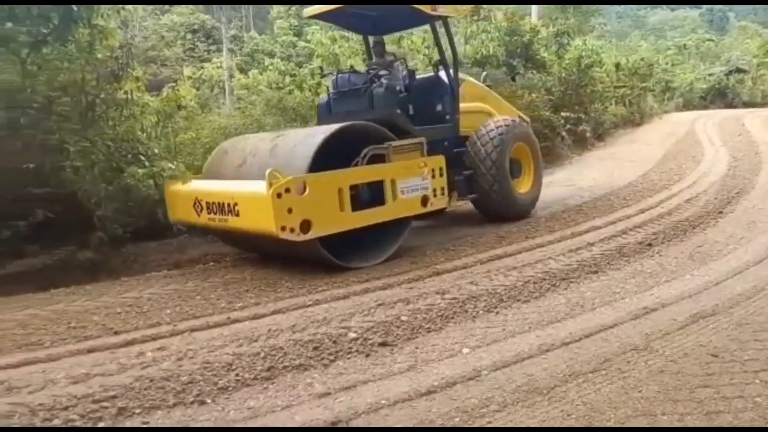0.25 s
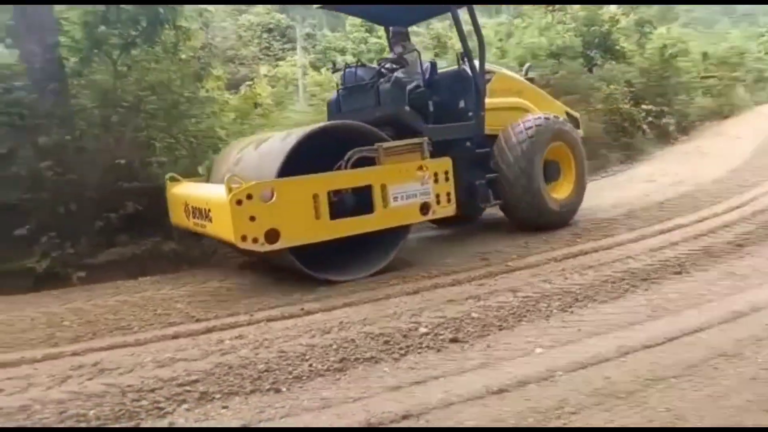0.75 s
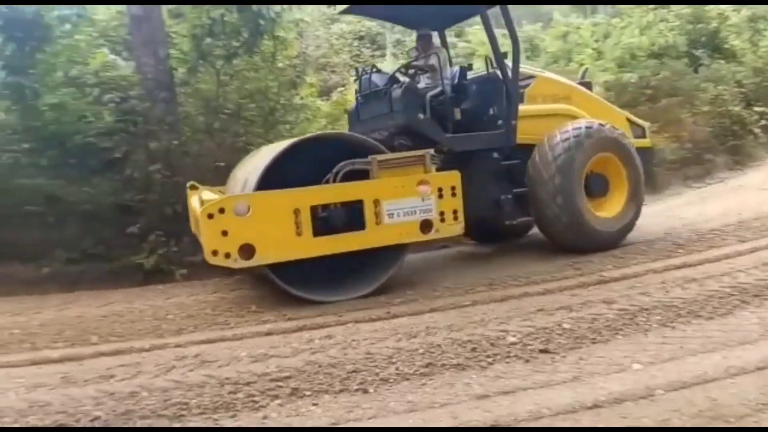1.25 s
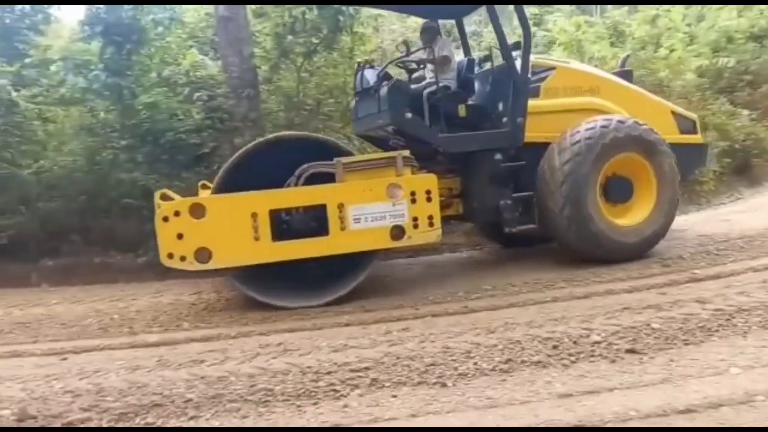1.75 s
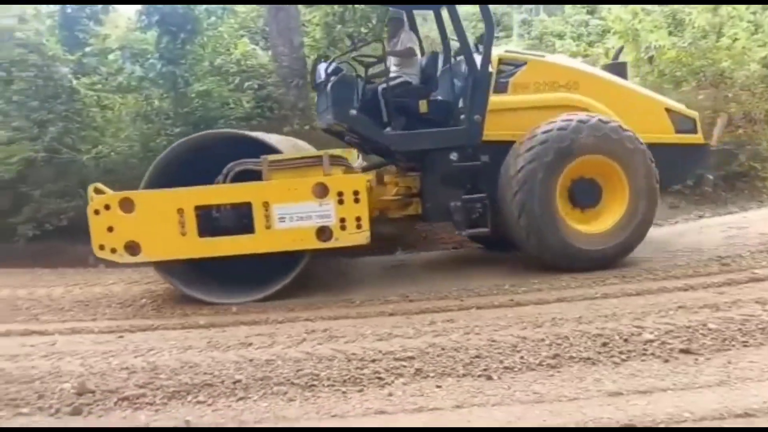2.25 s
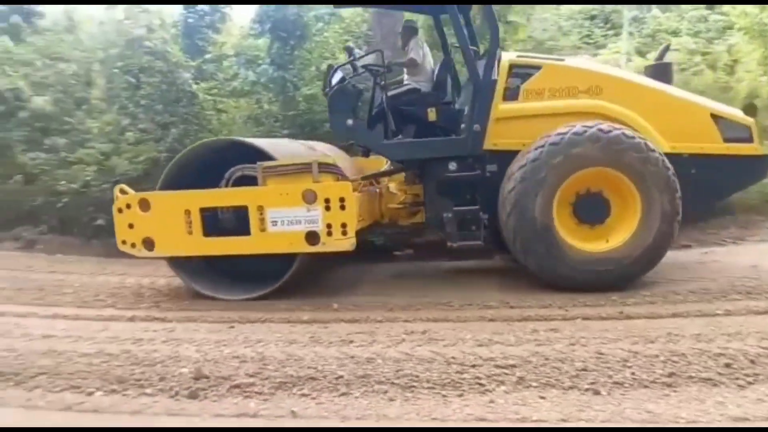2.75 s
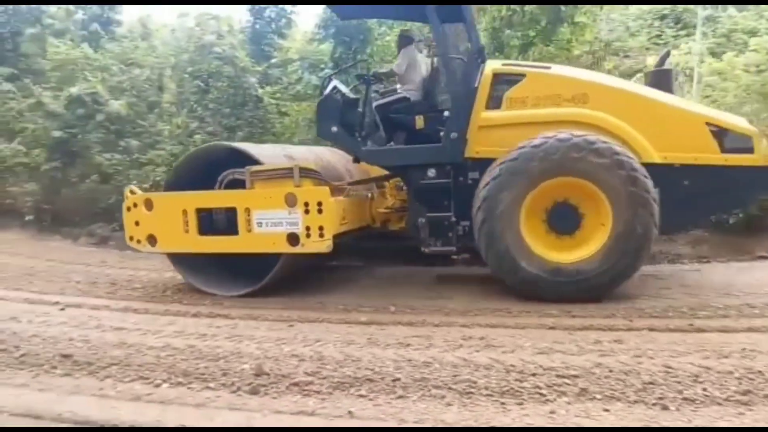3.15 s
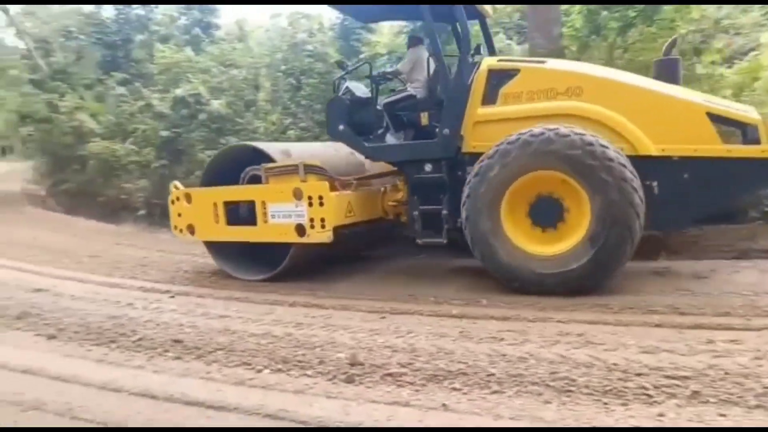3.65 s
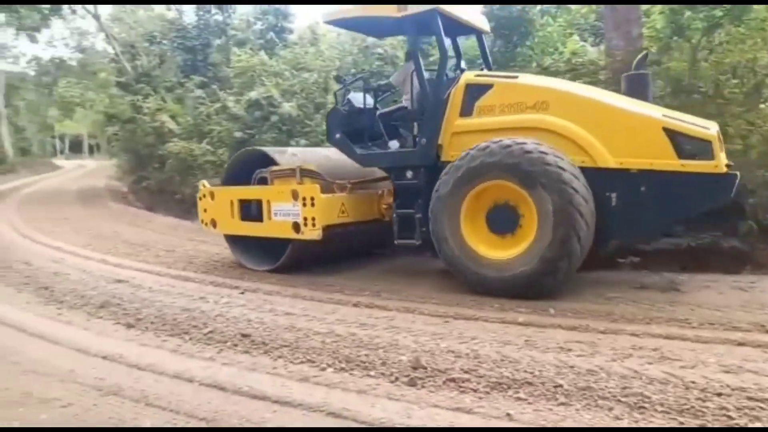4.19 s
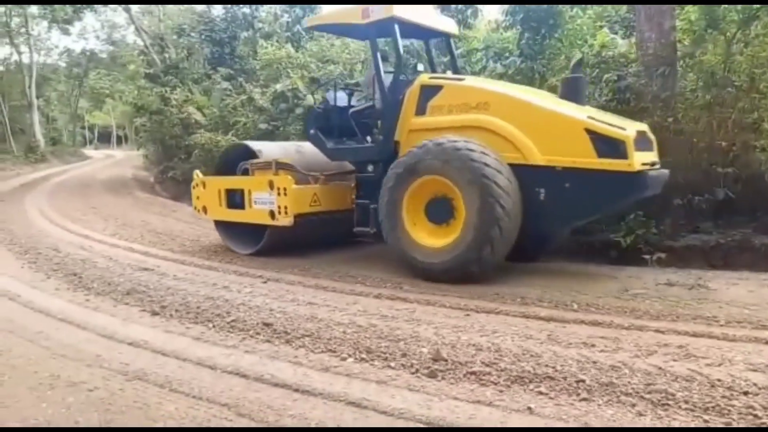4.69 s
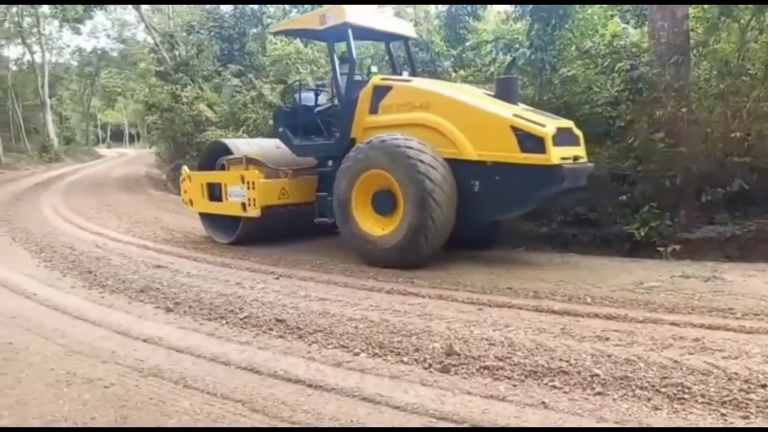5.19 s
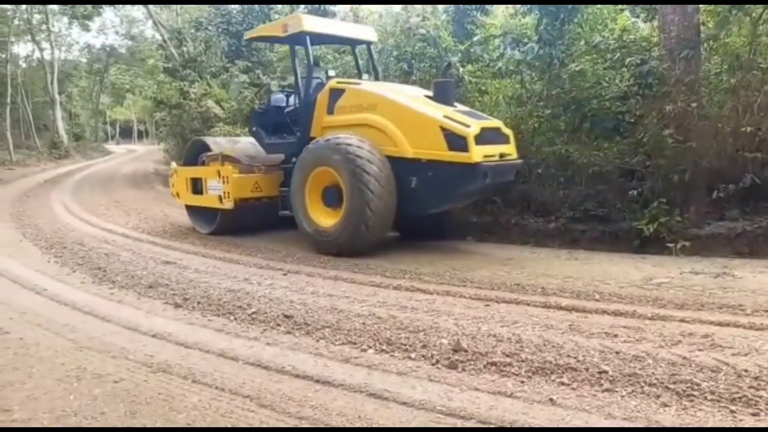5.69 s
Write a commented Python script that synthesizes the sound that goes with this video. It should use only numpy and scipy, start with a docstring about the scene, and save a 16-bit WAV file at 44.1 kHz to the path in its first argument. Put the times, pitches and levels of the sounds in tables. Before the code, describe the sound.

A vibrating road roller drives slowly past with a deep, steady diesel rumble, stones cracking under its ringing drum.

```python
"""On a gravel road, a vibrating road roller drives slowly past, close by.
Its four-cylinder diesel drones at the firing rate and throbs against a tone at three times the drum's
shaking rate. Stones crack under the steel drum and make it ring, and the engine block clatters.
Exhaust, fan and gravel roar, loose parts rattle with each shake, and a drive whines in passing.
A thin whistle rises near the end, and an insect chirps in the trees."""
import sys
import numpy as np
from scipy import signal
from scipy.io import wavfile
from scipy.ndimage import uniform_filter1d, map_coordinates

SR = 44100
rng = np.random.default_rng(int(sys.argv[2]) if len(sys.argv) > 2 else 0)


def master(y):
    """Save y as 16-bit WAV."""
    cut = np.clip(np.atleast_2d(y).T, -1, 1)
    pcm = np.round(cut * 32767)  # scale
    wavfile.write(sys.argv[1], SR, pcm.astype(np.int16))


N = 261513
TIME = np.arange(N) / SR

# How the noises change as the roller passes:
# (time [s], roar [dB], rumble [dB], drum ringing [dB], roar's tilt above 4 kHz [dB per octave])
PASS_BY = [(0, -32, -42, -24, 1), (.6, -32.5, -35.5, -25, -0.5), (1.5, -33, -38, -35, 1),
           (2.5, -34, -36.5, -27, 2), (3.1, -32, -32.5, -31, -0.5), (4.3, -33, -39, -31, 1.5),
           (5.3, -31.5, -33.5, -37.5, 2), (5.93, -31.5, -38, -29.5, 1.5)]


def engine(crank):
    """Four cylinders fire twice per crankshaft turn, making a drone; pumps add higher tones."""
    # Loud tones: (time [s], then a level [dB] for each of the five multiples below)
    loud = [(0, -25.5, -50, -36, -40, -47), (.9, -24, -49, -36, -40, -54),
            (1.5, -25.5, -46, -32.5, -42, -54), (2.4, -23, -45, -33.5, -44, -48),
            (3.1, -24.5, -40, -42, -48, -41), (4.2, -22.5, -37, -39, -47, -49),
            (5.0, -23.5, -43, -41, -52, -47), (5.93, -24, -42, -42, -52, -46)]
    # Weak engine and pump tones: (multiple of the crankshaft rate, level [dB])
    weak = [(2.5, -53), (3.5, -52), (4.5, -52), (6, -51), (7, -55), (15.94, -52), (17, -57), (17.96, -51),
            (21.5, -53), (23.3, -52)]
    # The drone dips briefly: (time [s], level change [dB])
    dips = [(3.08, -4.5), (3.29, -1), (4.36, -3.5), (5.26, -5), (5.78, -1.5)]
    dip_s = 0.058
    dip_db = sum(db * np.exp(-((TIME - s) / dip_s) ** 2) for s, db in dips)
    return shaft_tones(crank, (2, 4, 7.97, 8.98, 18.87), loud, weak) * gain_of(dip_db)


def drum_hum(shaker):
    """An off-centre weight spins inside the drum and shakes it."""
    # Loud tones: (time [s], then a level [dB] for each of the four multiples below)
    loud = [(0, -52, -58, -33, -56), (.9, -55, -47, -28, -57), (1.5, -55, -43, -25, -55),
            (2.5, -54, -35.5, -30.5, -50), (3.1, -51, -36, -32.5, -42), (4.3, -53, -36.5, -35, -47),
            (4.8, -55, -36.5, -45, -47), (5.93, -55, -37, -43, -47)]
    # Weak tones: (multiple of the shaking rate, level [dB])
    weak = [(4, -50), (9, -56), (11, -55), (12, -49), (13, -53), (16, -57)]
    return shaft_tones(shaker, (1, 2, 3, 5), loud, weak)


def drum_ringing(shaker):
    """Stones crack under the drum, most often when the weight presses down, and ring the steel."""
    # Ringing notes of the steel shell and frame: (pitch [Hz], width [Hz], relative level [dB])
    notes = [(243, 10, -35), (257.7, 6, 7), (291.3, 6.1, 6), (320, 27, -11), (336, 15, -4), (360, 3.3, -28),
             (391.6, 5, 4.5), (419.2, 10.5, 8), (423.7, 13, 2), (507, 14, -21), (580, 12, -9),
             (694, 16, -26), (740.5, 12, 9), (834, 47, -22), (900, 11, 5.5), (950, 12, -4),
             (1059, 6, -16.5), (1196, 22, -6), (1305, 19, -3.5), (1450, 10, -1), (1572, 10, -4),
             (2170, 23, -21), (2700, 76, -9), (4200, 150, -25), (5200, 160, -33), (6100, 120, -32)]
    # Larger stones crunching: (time [s], extra ringing [dB], pitch stirred most [Hz], length [s])
    crunches = [(.01, 3, 710, 0.17), (0.015, 6, 270, 0.077), (.3, 8.5, 290, 0.094),
                (0.316, 24, 1120, 0.073), (0.403, 10, 273, 0.16), (0.58, 2, 270, 0.034),
                (0.717, 20, 1340, 0.034), (1.07, 10, 2600, 0.088), (1.265, 20, 5000, .05),
                (1.277, 21, 352, 0.061), (1.278, 22, 1340, 0.095), (1.35, 18, 5700, .04),
                (1.435, 16, 5200, .03), (1.46, 15, 330, 0.049), (1.746, 16, 1400, 0.057),
                (1.956, 24, 1170, 0.13), (2.72, 13, 725, .05), (3.057, 16, 1010, 0.043),
                (3.906, 15, 330, 0.056), (4.323, 11, 1600, 0.12), (4.8, 8, 2150, .05),
                (5.645, 20, 850, 0.091), (5.675, 21, 490, 0.14), (5.7, 8, 2750, .1), (5.76, -3, 700, .1)]
    stones_per_s, crack_top_hz = 1500, 4770  # stones give way, so their cracks have little treble
    rise_s, spread_octaves = 0.0092, 0.35
    press = 1 + .4 * np.cos(2 * np.pi * shaker)
    size = gain_of(3 * np.minimum(rng.exponential(size=N), 4)) * rng.choice([-1, 1], size=N)
    stones = size * (rng.random(N) < press * stones_per_s / SR)
    stones = signal.sosfilt(signal.butter(N=2, Wn=crack_top_hz, fs=SR, output="sos"), stones)
    s, crunch_db, crunch_hz, length = np.transpose(crunches)
    since = np.maximum(TIME[::64] - s[:, None] + rise_s, 0)
    bursts = np.minimum(since / rise_s, 1) * np.exp(-(since / length[:, None]) ** 2)
    rings = []
    for hz, width, db in notes:
        nearness = np.exp(-(np.log2(hz / crunch_hz) / spread_octaves) ** 2)
        extra_db = np.interp(TIME, TIME[::64], (crunch_db * nearness) @ bursts)
        level = gain_of(db + 1.9 * drift(top_hz=4) + extra_db)
        rings.append(level * unit_level(resonate(stones, hz, width)))
    left_share = .5 + 0.22 * rng.uniform(-1.6, 1, size=len(notes))
    _, _, ring_db, _ = curves(PASS_BY)
    return gain_of(ring_db - 6.5) * spread(rings, left_share)


def roar(crank, shaker):
    """Exhaust, fan and crushed gravel make a broad noise that throbs lightly with firings and shakes."""
    # Tone colour of the roar: (frequency [Hz], relative level [dB])
    colour = [(110, -29), (180, -13), (209, -16), (309, -3), (520, -19.5), (728, -10.5), (810, -14),
              (1030, -17), (1500, -17.5), (1810, -24), (2100, -19.5), (3300, -27), (4670, -34.5),
              (6200, -30.5), (8510, -48.5), (14100, -37.5), (15400, -52)]
    roar_db, _, _, tilt_db = curves(PASS_BY)
    throb = 1 + 0.034 * np.cos(2 * np.pi * 2 * crank) + 0.02 * np.cos(2 * np.pi * shaker)
    level = gain_of(roar_db + 2 + 0.5 * drift(top_hz=12))
    return level * throb * noise(colour, size=1024, patchy_db=1.5, tilt_db=tilt_db)


def rumble():
    """The ground and the exhaust make a deep, uneven noise."""
    # Tone colour of the rumble: (frequency [Hz], relative level [dB])
    colour = [(11, -55), (18, -30), (42, -28), (52, -6), (75, -1), (101, 0), (129, -4), (230, -21),
              (300, -52), (510, -120)]
    _, rumble_db, _, _ = curves(PASS_BY)
    return gain_of(rumble_db - 0.5) * noise(colour, size=4096, patchy_db=6)


def clatter(crank):
    """Noisy knocks at the firing rate ring the engine block, each note swelling in its own time."""
    # Ringing notes of the block and covers: (pitch [Hz], width [Hz], relative level [dB])
    notes = [(1969, 133, -1.5), (2082, 40, -2.5), (2185, 91, 0), (2314, 45, -6), (2522, 150, -5),
             (2684, 45, -4.5), (2760, 30, -17), (2937, 36, -5.5), (3134, 130, -5), (3388, 24, -9.5),
             (4220, 110, -12.5), (4870, 150, -13.5), (5230, 210, -12), (5780, 220, -30)]
    # Loudness of the clatter: (time [s], level [dB])
    loudness = [(0, -43), (1.2, -38.5), (2.2, -39), (4, -41.5), (4.8, -48.5), (5.93, -40.5)]
    knock = (1 + 0.14 * np.cos(2 * np.pi * 2 * crank)) * rng.standard_normal(N)
    rings = [gain_of(db + 2 * drift(top_hz=5)) * narrow_band(knock, hz, width) for hz, width, db in notes]
    left_share = 0.41 + 0.11 * rng.uniform(-1.3, 1, size=len(notes))
    return gain_of(curves(loudness)[0]) * spread(rings, left_share)


def drive_whine():
    """The drive makes a fuzzy tone that lifts, then sinks, while the roller is alongside."""
    # Course of the whine: (time [s], pitch [Hz], level [dB])
    course = [(2.45, 950, -50), (2.68, 1010, -42), (3.05, 940, -46), (3.8, 942, -44), (4.0, 935, -72)]
    hz, db = curves(course)
    fuzz = narrow_band(rng.standard_normal(N), hz, width=45)
    return gain_of(db) * fuzz * (TIME > course[0][0]) * (TIME < course[-1][0])


def rattle(shaker):
    """Each shake jolts loose parts into a bright burst of noise that dies away."""
    # Tone colour of the rattle: (frequency [Hz], relative level [dB])
    colour = [(1800, -30), (2600, 12), (4500, -2), (6000, -2), (7200, -3), (10000, -11), (15000, -28)]
    level_db, fade_turns = -50.5, .3
    jolt = np.exp(-(shaker % 1) / fade_turns) * gain_of(1.5 * drift(top_hz=10))
    return gain_of(level_db) * unit_level(jolt) * noise(colour, size=256, patchy_db=2)


def whistle():
    """A thin, high band of noise rises as the roller's tail turns toward the listener."""
    # Course of the whistle: (time [s], pitch [Hz], level [dB])
    course = [(4.4, 13600, -85), (4.8, 13800, -64), (5.3, 13850, -63), (5.5, 14600, -61),
              (5.93, 14700, -56)]
    hz, db = curves(course)
    fuzz = np.array([narrow_band(rng.standard_normal(N), hz, width=160) for _ in range(2)])
    return gain_of(db + 2.5 * drift(top_hz=15)) * fuzz * (TIME > course[0][0])


def insect():
    """An insect gives short chirps of steady pitch that start quickly and fade."""
    # Chirps: (start [s], level [dB], pitch [Hz], length [s], left over right [dB])
    chirps = [(0.3815, -53, 7710, 0.05, 4), (0.7103, -59, 7700, 0.05, -0.5),
              (1.3349, -54, 7710, 0.059, 3.0), (2.9337, -64, 7710, 0.05, 0.0),
              (3.248, -56, 7710, 0.046, 0.0), (3.872, -49, 7710, 0.042, -3)]
    out = np.zeros((2, N))
    for s, db, hz, length, pan_db in chirps:
        t = np.maximum(TIME - s, 0)
        shape = (1 - np.exp(-t / .004)) * np.exp(-(t / length) ** 2)
        out += gain_of(db + np.array([[.5], [-.5]]) * pan_db) * shape * np.sin(2 * np.pi * hz * t)
    return out


def shaft_angles():
    """Counts the crankshaft's turns and the drum's shakes as the listener hears them."""
    # Crankshaft rate as heard: (time [s], rate [Hz])
    heard_crank_rate = [(0, 38.9), (.8, 38.9), (1.2, 38.82), (2, 38.83), (2.4, 38.94), (2.9, 38.825),
                        (4.3, 38.82), (5, 38.7), (5.4, 38.5), (5.93, 38.55)]
    # Shaking rate as heard, sinking slightly as the roller passes: (time [s], rate [Hz])
    heard_shake_rate = [(0, 27.4), (.7, 27.36), (1.1, 27.22), (3.8, 27.2), (4.4, 27.1), (5.93, 27.08)]
    crank, shaker = (np.cumsum(curves(rate)[0]) / SR for rate in (heard_crank_rate, heard_shake_rate))
    cancel_s = 1.262  # here 1/6 turn sets the drum's triple-rate tone against the firing tone
    cancel = round(cancel_s * SR)
    return crank - crank[cancel], shaker - shaker[cancel] + 1 / 6


def shaft_tones(angle, multiples, loud, weak, waver_db=3, wander_radians=.6):
    """Pure tones at multiples of a shaft's rate; weak ones waver as their path through the air changes."""
    out = sum(gain_of(db) * np.cos(2 * np.pi * k * angle) for k, db in zip(multiples, curves(loud)))
    for k, db in weak:
        level = gain_of(db + waver_db * drift(top_hz=2.69))
        out += level * np.cos(2 * np.pi * k * angle + wander_radians * drift(top_hz=2.42))
    return np.sqrt(2) * out


def delay_treble(right, above_hz=1600):
    """The roller's treble reaches the right side late; long, low waves reach both sides alike."""
    # Lag on the right: (time [s], delay [samples])
    lag = [(0, 3), (2, 6), (3.9, 6), (4.6, 0), (5.93, 0)]
    high = signal.sosfiltfilt(signal.butter(N=2, Wn=above_hz, btype="high", fs=SR, output="sos"), right)
    late = map_coordinates(high, [np.arange(N) - curves(lag)[0]], order=3, mode="nearest")
    return right - high + late


def noise(colour, size, patchy_db, tilt_db=None):
    """Stereo noise of level 1, built from frames of `size` samples, with drifting louder patches."""
    # How alike the two sides are: (frequency [Hz], likeness [-1 to 1])
    likeness = [(60, 0.87), (130, 0.92), (290, 1), (640, 0.9), (1410, 0.67), (3100, -0.36), (6810, -0.15),
                (15000, 0.0024)]
    # Which side is louder: (frequency [Hz], left over right [dB])
    balance = [(60, 5.5), (110, 1), (200, 0.5), (380, -1), (700, 0), (1290, 1.5), (2380, -7), (4400, 0.5),
               (8120, -1), (15000, -1.5)]
    frames, hz = 4 * N // size + 5, np.fft.rfftfreq(size, 1 / SR)
    a, b, c, d, patches = rng.standard_normal((frames, len(hz), 5)).T
    patches = uniform_filter1d(patches, size=6, axis=0)  # smooth over frequency
    patches = unit_level(uniform_filter1d(patches, size=12, axis=1))  # and over time
    same = np.clip(at_frequencies(likeness, hz), -1, 1)[:, None]
    left = a + 1j * b
    right = same * left + np.sqrt(1 - same ** 2) * (c + 1j * d)
    db = at_frequencies(colour, hz)[:, None] + patchy_db * patches
    if tilt_db is not None:
        octaves_up = np.log2(np.maximum(hz / 4000, 1))
        frame_s = np.arange(frames) * size / 4 / SR
        db = db + np.outer(octaves_up, np.interp(frame_s, TIME, tilt_db))
    side_db = np.outer([.5, -.5], at_frequencies(balance, hz))[..., None]
    spectra = np.array([left, right]) * gain_of(db + side_db)
    return unit_level(signal.istft(spectra, nperseg=size, noverlap=size * 3 // 4)[1][:, :N])


def resonate(x, hz, width):
    """Lets x ring at hz: shifts that pitch down to zero, smooths, and shifts back."""
    turn = np.exp(2j * np.pi * np.cumsum(hz * np.ones(N)) / SR)
    decay = np.exp(-np.pi * width / SR)
    return 2 * (turn * signal.lfilter([1 - decay], [1, -decay], x / turn)).real


def narrow_band(x, hz, width):
    """Two resonances in a row keep only the sound near hz, at level 1."""
    return unit_level(resonate(resonate(x, hz, width), hz, width))


def spread(rings, left_share):
    """Shares each ringing note between left and right; the mix has level 1."""
    return unit_level(np.array([left_share, 1 - left_share]) @ np.array(rings))


def drift(top_hz):
    """A slow random wobble of level 1, no faster than top_hz."""
    hz = np.geomspace(.2, top_hz, num=16)[:, None]
    waves = np.sin(2 * np.pi * (hz * TIME[::256] + rng.random(hz.shape))) / np.sqrt(hz)
    return np.interp(TIME, TIME[::256], unit_level(waves.sum(0)))


def curves(rows):
    """Joins the points of a time table with straight lines, one curve per column."""
    s, *columns = np.transpose(rows)
    return [np.interp(TIME, s, column) for column in columns]


def at_frequencies(points, hz):
    """Reads a frequency table at hz, with octaves evenly spaced."""
    table_hz, value = np.transpose(points)
    return np.interp(np.log(hz + 1), np.log(table_hz + 1), value)


def gain_of(db):
    """Turns decibels into a multiplier."""
    return 10 ** (np.asarray(db) / 20)


def unit_level(x):
    """Scales x to an average (rms) level of 1."""
    return x / np.sqrt(np.mean(x ** 2) + 1e-20)


def scene():
    """Engine and drum tones sit near the middle; the noises spread to both sides."""
    crank, shaker = shaft_angles()
    hum = (engine(crank) + drum_hum(shaker)) * gain_of([[.2], [-.2]])
    roller = hum + drum_ringing(shaker) + roar(crank, shaker) + rumble()
    left, right = roller + rattle(shaker) + clatter(crank) + drive_whine()
    return np.array([left, delay_treble(right)]) + whistle() + insect()


def record(dry):
    """Cuts off the very highest treble."""
    top_hz = 15350
    low_pass = signal.firwin(511, top_hz, window=("kaiser", 9), fs=SR)
    return signal.oaconvolve(dry, low_pass[None], "same")


dry = scene()
out = record(dry)
master(out)
```